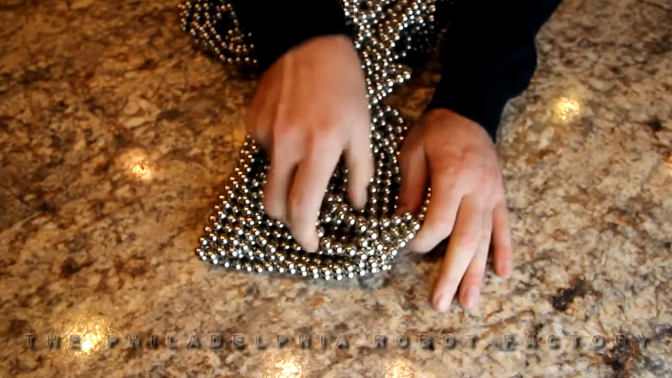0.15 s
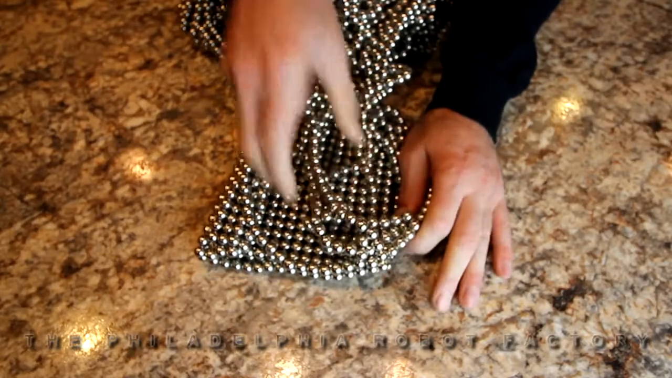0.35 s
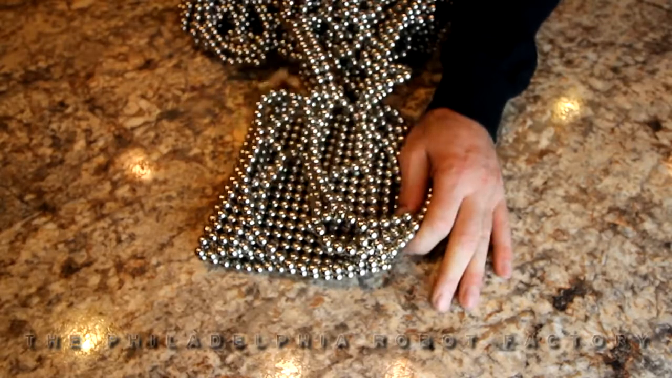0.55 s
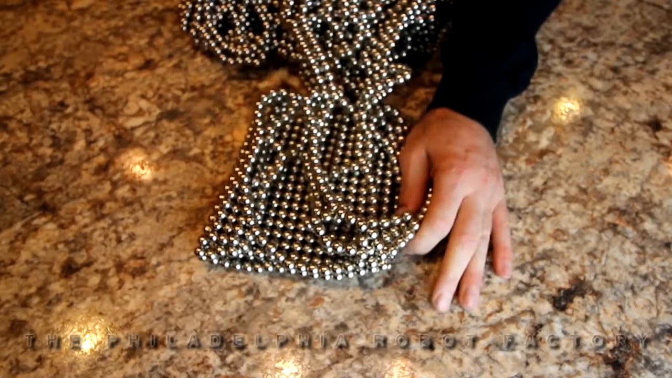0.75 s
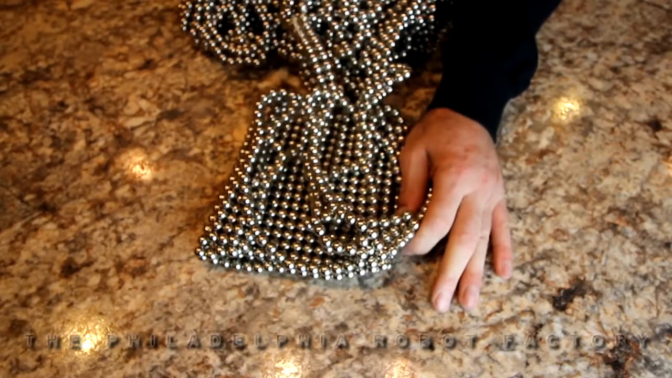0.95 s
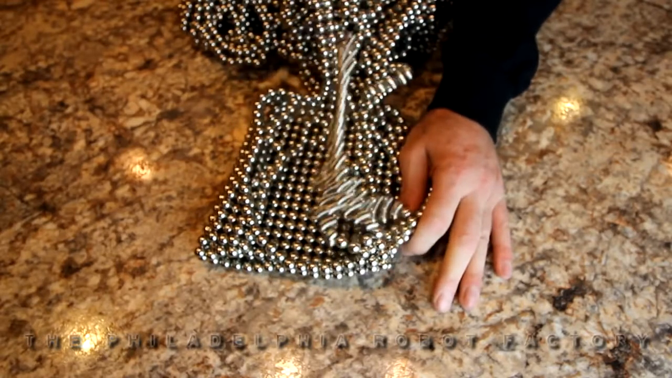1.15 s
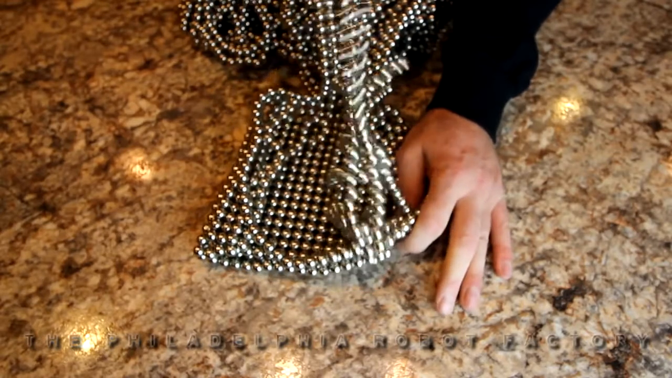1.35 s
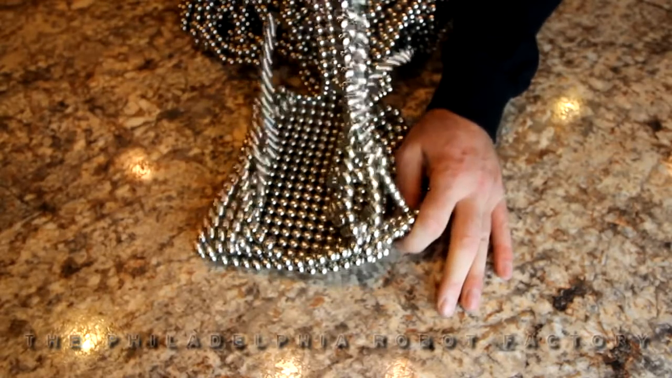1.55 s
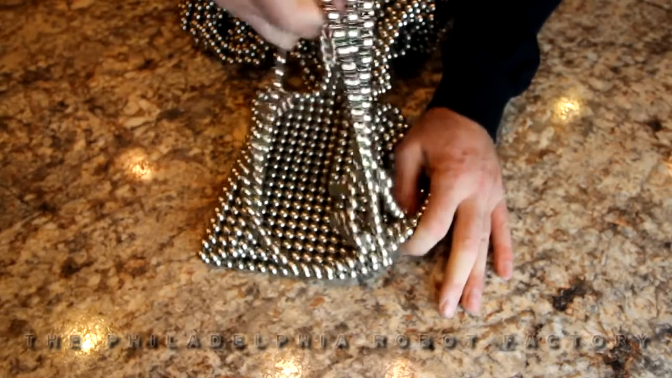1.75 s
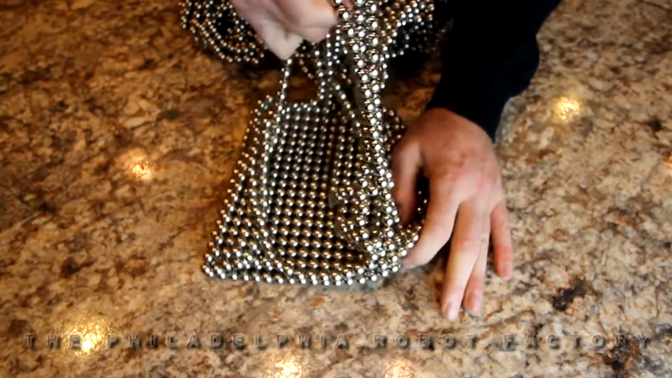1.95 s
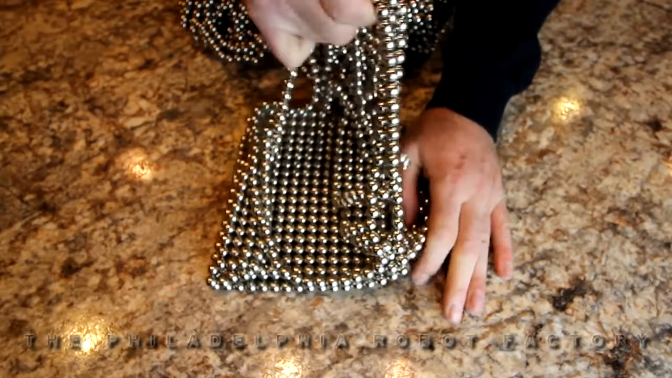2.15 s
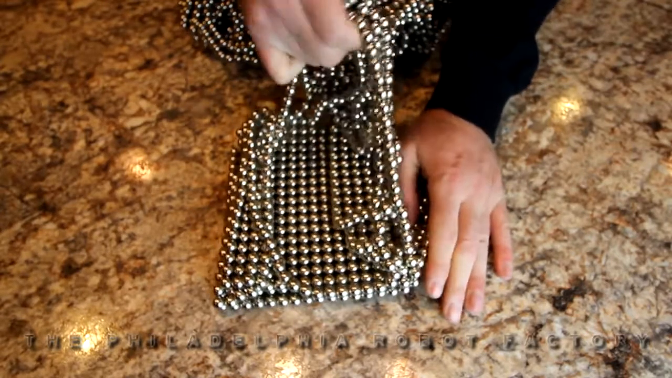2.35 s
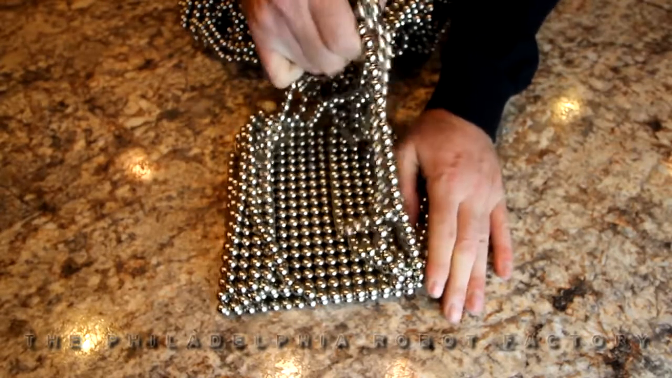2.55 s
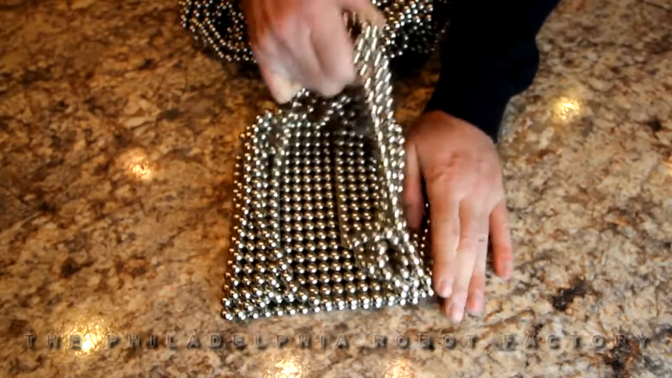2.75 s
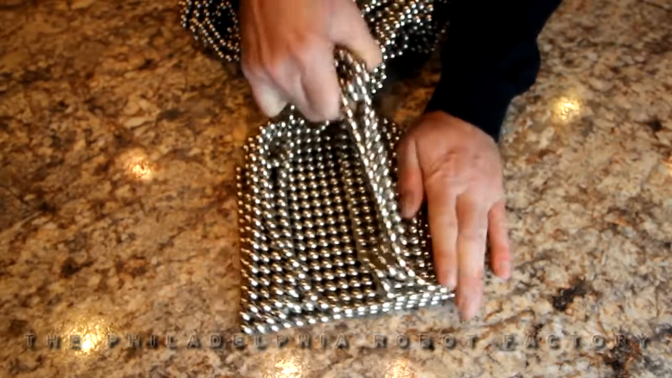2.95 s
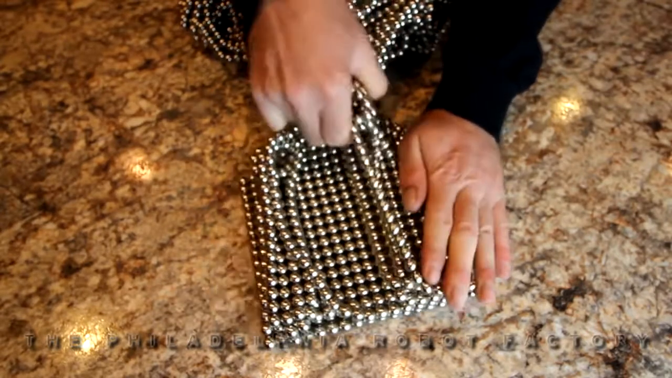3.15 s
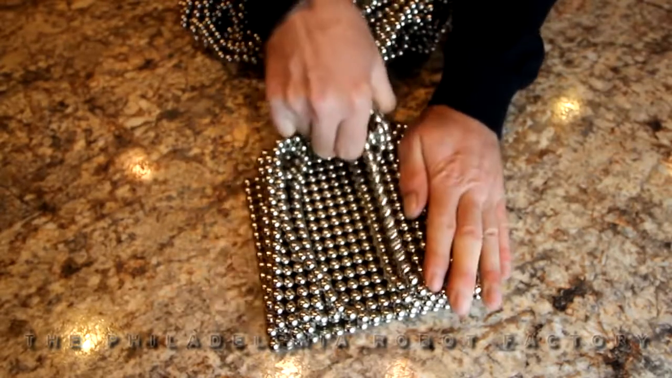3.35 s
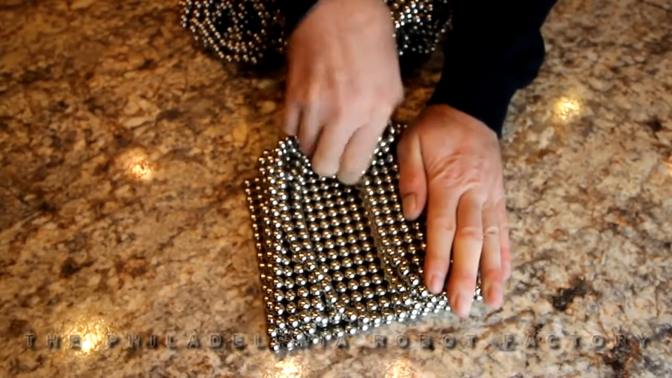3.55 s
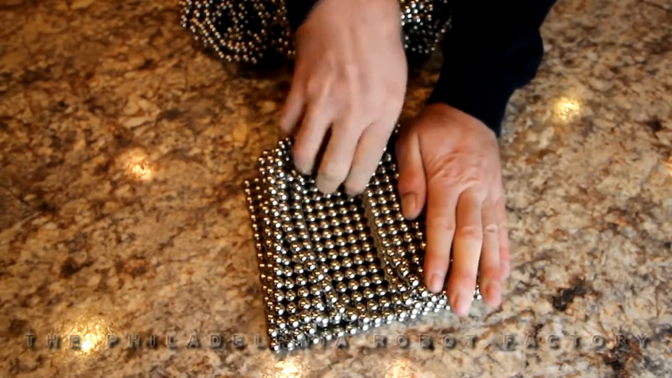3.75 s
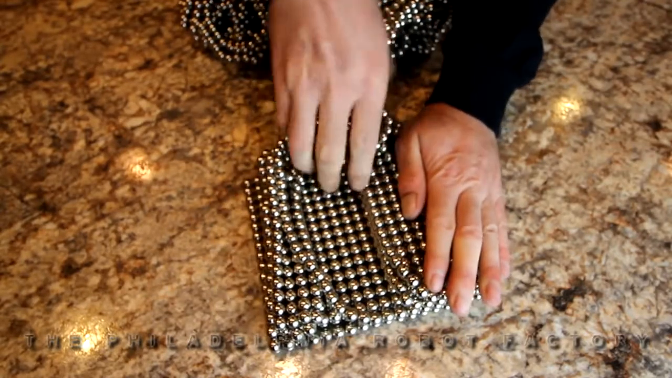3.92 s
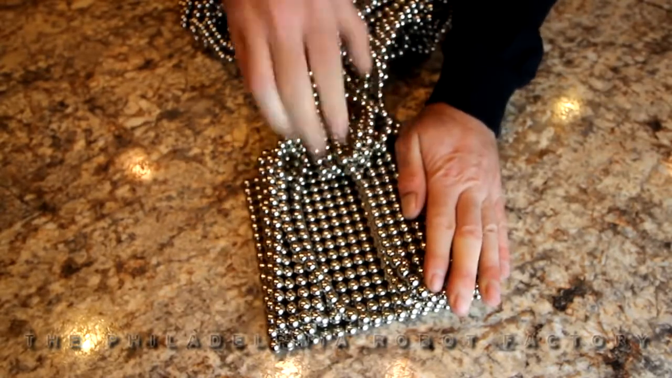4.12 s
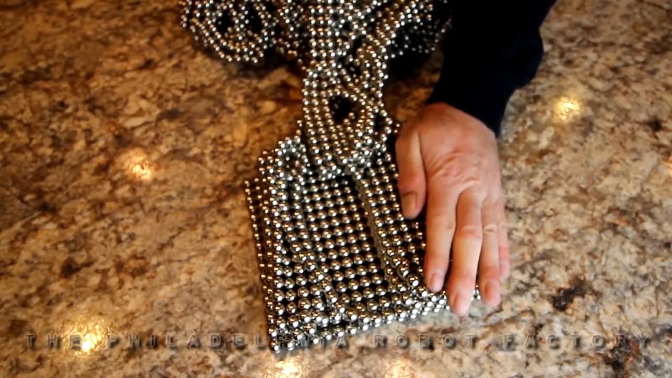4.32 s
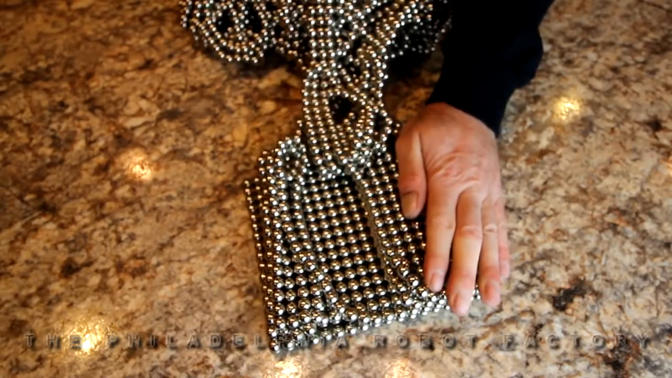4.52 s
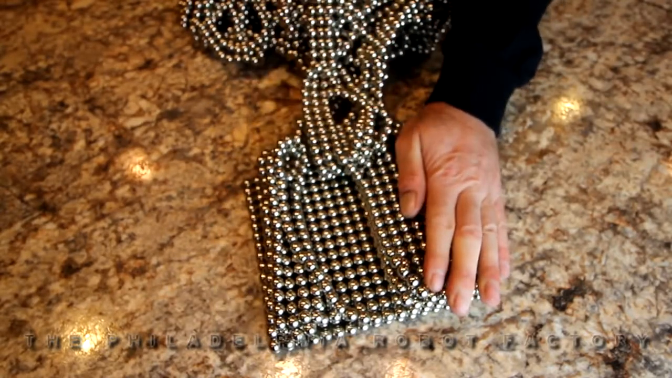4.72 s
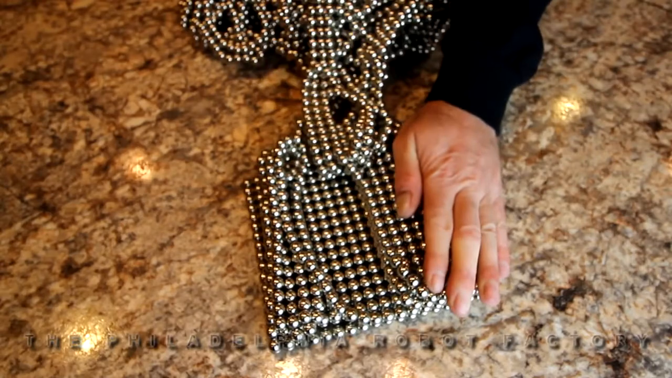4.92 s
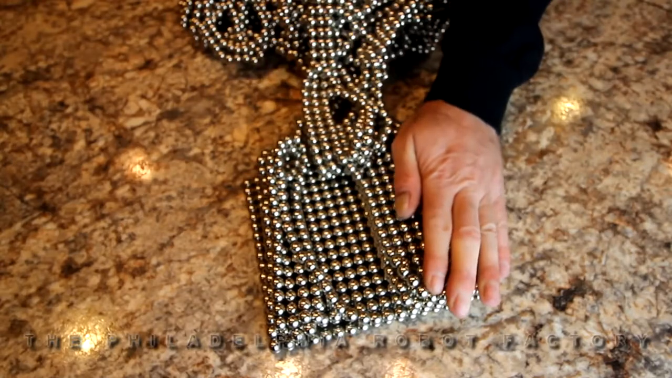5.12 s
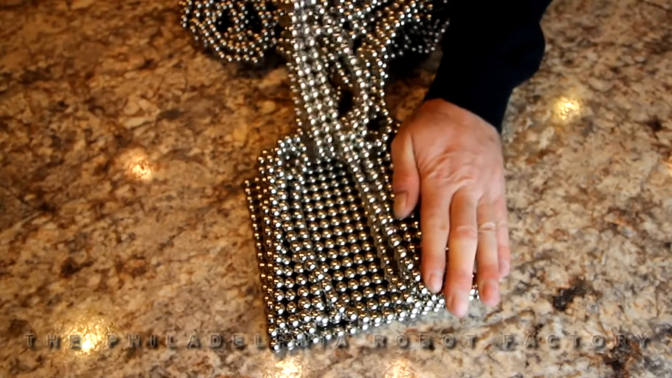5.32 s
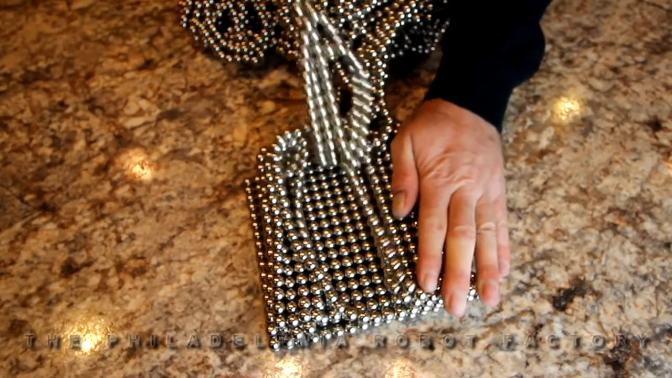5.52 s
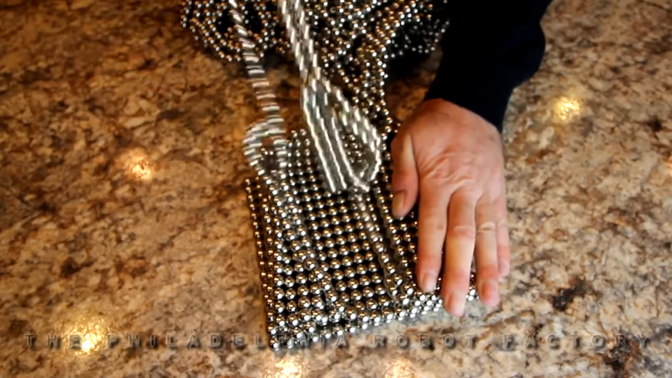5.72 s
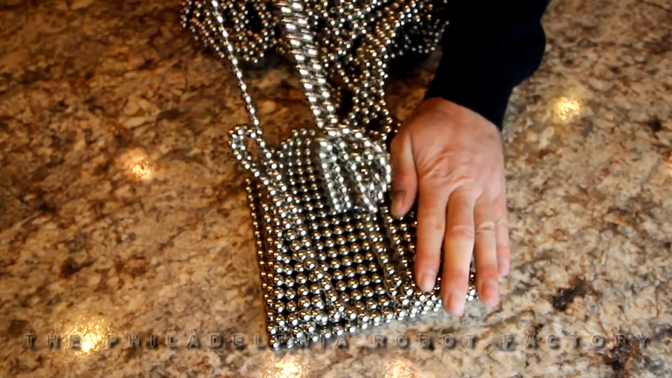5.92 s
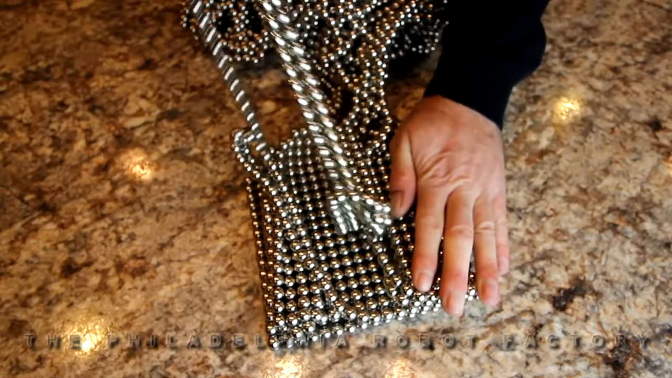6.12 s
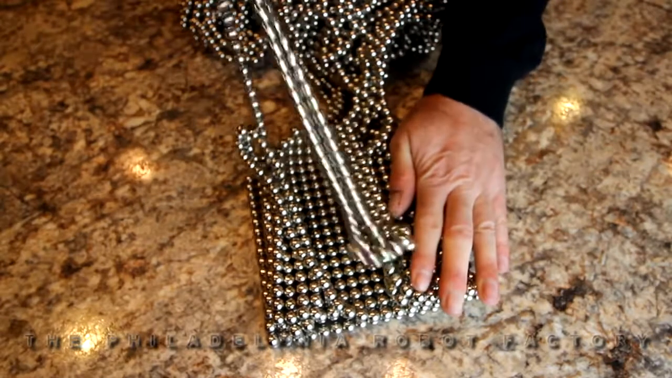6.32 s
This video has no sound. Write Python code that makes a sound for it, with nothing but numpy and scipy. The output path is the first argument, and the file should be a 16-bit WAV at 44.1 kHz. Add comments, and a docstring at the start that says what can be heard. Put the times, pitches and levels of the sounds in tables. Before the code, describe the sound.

Reversed sound of small magnet balls on a stone countertop, close and crisp in a quiet kitchen; short echoes swell into every click and stop abruptly. At 0.1 s comes a loud cluster of steel snaps with a low counter boom, then a dull bump near 0.27. A faint sleeve swish fills the lull until 0.7, when quick ticking runs begin. From 1.15 to 1.9 clicks thicken, with clumps knocking, gritty drags and ringing stone. Scattered clicks and runs continue to 2.7; a heavier knock and scraping slide follow at 2.8-3.2. Strong snaps strike at 3.55 and 3.77, with a clack and soft hand thumps to about 4.1. It is nearly silent until sharp snaps at 4.4. Sparse ticks lead to renewed crackling runs at 5.2-5.6, then lighter irregular clicking, with a last rattle and drag near 6.45.

```python
"""Magnet balls on stone, reversed

Chains of small magnet balls are peeled off a sheet on a stone countertop, and the sound is played backwards.
Balls click as short noise bursts coloured like steel; clumps knock, drag and excite resonances of the stone.
Hands drive low resonances of slab and cabinet, and a sleeve swishes as filtered noise over a faint hush.
All is built in forward time, then reversed: the kitchen's echo swells before every click and stops dead.
"""
import sys
import numpy as np
from scipy import signal
from scipy.fft import rfft, irfft, next_fast_len
from scipy.io import wavfile
from scipy.ndimage import map_coordinates

SR = 44100
rng = np.random.default_rng(int(sys.argv[2]) if len(sys.argv) > 2 else 0)


def generate_wav(sig):
    """Save sig (samples, or channels by samples) to the path in sys.argv[1] as 16-bit PCM at SR."""
    pcm = np.round(np.clip(np.atleast_2d(sig).T, -1, 1) * 32767).astype(np.int16)
    wavfile.write(sys.argv[1], SR, pcm)


N = 285327

# Single balls jumping together: (playback time [s], relative level [dB], relative body from the stone [dB])
SNAP_EVENTS = [(0.018, -25, 22), (0.0467, -21.5, -9), (0.0672, -30, 5), (0.083, -24, 37), (0.0909, -9, 9),
               (0.0966, -7.5, 6), (0.1032, -1.5, -7), (0.106, 0.5, -4), (0.105, -12.5, 28),
               (0.1136, -3.5, 4), (0.14, -30.5, 22), (0.2814, -17.5, 8.5), (0.7133, -15, 11),
               (0.7211, -16, 11), (0.73, -13.5, 13), (0.7376, -22.5, 13), (0.846, -19, -4),
               (0.872, -10, -4), (0.915, -17, -16), (0.94, -15.5, -9), (0.949, -19, -2), (0.99, -16, -3),
               (1.0113, -16, 2), (1.0317, -18, 5), (1.1625, -15.5, 25), (1.1745, -14, 20), (1.185, -7, 9),
               (1.2052, -13.5, 9), (1.215, -27, 0), (1.276, -21, 0), (1.3373, -28.5, -4),
               (1.3726, -17, -17), (1.407, -9.5, 13), (1.449, -10, 4), (1.4863, -16, 5), (1.514, -13.5, 10),
               (1.57, -14.5, -15), (1.592, -9, 9), (1.6111, -10, 1), (1.624, -5, -17), (1.643, -16, 6),
               (1.8348, -11, 4), (1.8743, -10, -30), (1.895, -13.5, -23), (1.9121, -18, 12),
               (1.9336, -36, 2), (1.972, -23.5, -11), (1.983, -27, 6), (2.049, -24, -10),
               (2.1336, -25.5, 0), (2.162, -12.5, 1), (2.188, -15.5, 11), (2.2235, -13.5, 8),
               (2.2627, -17.5, 16), (2.31, -20, -2), (2.327, -12, 15), (2.361, -10, -28),
               (2.3735, -12.5, -23), (2.4784, -25, 2), (2.4999, -30, -6), (2.54, -11, -15),
               (2.5764, -11, 1), (2.5915, -15, 12), (2.6093, -12, 11), (2.6283, -21, 0), (2.656, -18.5, 10),
               (2.827, -10.5, 8), (2.886, -11.5, -11), (2.8969, -15, -3), (2.944, -25, 24),
               (2.9616, -22, 12), (3.013, -19, -5), (3.0183, -26, 0), (3.0402, -16, -36), (3.0748, -21, 9),
               (3.1115, -15.5, -16), (3.1361, -9.5, -4), (3.1642, -14, -8), (3.207, -21, 15.5),
               (3.223, -7.5, -7), (3.227, -12.5, 6), (3.2516, -20.5, 10), (3.331, -19, 13),
               (3.342, -17.5, 3), (3.3937, -19.5, 10), (3.41, -13.5, 9), (3.426, -14, -5), (3.437, -16, -2),
               (3.444, -18.5, -2), (3.4886, -18, 2), (3.549, -2, -8), (3.558, -4, 6), (3.5628, -3, 15),
               (3.602, -20, 5), (3.627, -9.5, 11), (3.685, -16.5, 2), (3.6916, -15, 2), (3.7607, -6.5, 10),
               (3.769, -2, -2), (3.7768, -6.5, 6), (3.802, -21.5, 27), (3.81, -16.5, 2),
               (3.8345, -18.5, 14), (3.947, -22.5, 25), (4.117, -50.5, 24), (4.3544, -25, 10),
               (4.4123, -8.5, 7), (4.443, -5.5, 4), (4.446, -7.5, 6), (4.4541, -5.5, -16),
               (4.6102, -15, -3), (4.6235, -11, -8), (4.651, -22.5, 7.5), (4.75, -17, 4), (4.8259, -19, 9),
               (4.835, -28, 12), (4.8794, -24.5, 11), (4.8966, -20, 9), (4.903, -23, 15),
               (4.912, -20.5, 10), (5.0212, -19.5, -2), (5.063, -23.5, 8), (5.0876, -29, -4),
               (5.1536, -14, 4), (5.161, -24, 10), (5.202, -25, 4), (5.2094, -11.5, -22), (5.2453, -12, 13),
               (5.2586, -13, -4), (5.288, -9.5, -7), (5.3033, -17, -4), (5.317, -8.5, 11.5),
               (5.3336, -12, 0), (5.353, -15, 7.5), (5.3785, -15, -5), (5.4051, -14, -2),
               (5.4668, -24.5, 11), (5.5297, -18, 8), (5.546, -27, 3), (5.583, -10, -22), (5.603, -6, -32),
               (5.61, -13, 9), (5.6626, -22, 7), (5.6943, -22, 0), (5.7706, -11, -3), (5.7819, -23, 7),
               (5.798, -19.5, -4), (5.853, -12, -6), (5.8742, -13.5, -21), (5.8985, -10.5, -31),
               (5.955, -14.5, -2), (5.9841, -24, 14), (6.0455, -16, -13), (6.0638, -20, 10),
               (6.096, -19.5, 5), (6.131, -22, 3), (6.1469, -9.5, -37), (6.173, -24.5, 4), (6.2023, -17, 7),
               (6.3135, -23, 8), (6.3323, -17.5, 2), (6.357, -12, 0), (6.393, -28, 7), (6.4159, -15.5, -13)]
# Chains peeled in a run of clicks: (playback start [s], playback end [s], nominal level [dB], rate [clicks/s])
PEEL_RUNS = [(0.673, 0.738, -26.5, 172), (0.817, 0.878, -22, 133), (0.9, 1.081, -27, 56),
             (1.154, 1.274, -23.5, 69.5), (1.307, 2.699, -32.5, 22), (1.603, 1.736, -24.5, 150),
             (1.739, 1.907, -19.5, 136), (2.276, 2.39, -19.5, 105), (2.512, 2.617, -24, 74),
             (2.755, 3.167, -25, 58), (3.18, 3.509, -29, 40), (3.535, 3.65, -17.5, 82),
             (4.4, 4.485, -21, 90), (4.7, 6.449, -33.5, 28.1), (5.209, 5.3, -23.5, 141),
             (5.545, 5.627, -19.5, 120), (6.279, 6.372, -23.5, 72), (6.443, 6.477, -21, 105)]
# Resonances of the stone slab: (frequency [Hz], bandwidth [Hz], relative level [dB])
SLAB_MODES = [(155.5, 11.2, -3), (213.8, 20, -3), (271.3, 26, -9), (390, 57, -11.5)]

MOVE_ONSET_DB_PER_S, MOVE_FADE_DB_PER_S = 604, 217  # in forward time: brisk start, slower fade


def amp(db):
    """Level law: decibels to amplitude gain."""
    return 10 ** (np.asarray(db) / 20)


def unit(x):
    """Power normalization: scale to an rms of 1."""
    return x / np.sqrt(np.mean(x ** 2) + 1e-20)


def along(points, hz):
    """Spectral interpolation: (frequency, value) points read on a logarithmic frequency axis."""
    f, v = np.transpose(points)
    return np.interp(np.log(hz + 1), np.log(f + 1), v)


def forwards(s):
    """Time reversal: playback time to the sample at which the event really happens."""
    return N - 1 - np.round(s * SR).astype(int)


def filtered(x, response):
    """Linear filtering: the spectrum is multiplied by a function of frequency."""
    size = next_fast_len(N + SR // 2)  # zero padding leaves room for the tail
    return irfft(rfft(x, size) * response(np.fft.rfftfreq(size, 1 / SR)), size)[:N]


def resonate(push, modes):
    """Modal superposition: a body answers with damped resonances of alternating sign."""
    def response(hz):
        total = 0
        for k, (centre, width, db) in enumerate(modes):
            damping = 1j * hz * width
            total = total + (-1) ** k * amp(db) * damping / (centre * centre - hz * hz + damping)
        return total
    return filtered(push, response)


def blows(s, db):
    """Impulse excitation: one impulse per contact, in forward time."""
    return np.bincount(np.clip(forwards(s), 0, N - 1), amp(db), N)


def moves(rows, fade=MOVE_FADE_DB_PER_S):
    """Exponential envelopes: each (start, end, level) move rises, holds and fades, in forward time."""
    s = np.arange(0, N / SR + .002, .002)
    first, last, db = np.transpose(rows)[:3, :, None]
    fade_db = fade * np.maximum(first - s, 0)
    onset_db = MOVE_ONSET_DB_PER_S * np.maximum(s - last, 0)
    gain = amp(np.max(db - fade_db - onset_db, axis=0))
    return np.interp(np.arange(N)[::-1] / SR, s, gain)


def surges(rate, depth_db):
    """Random amplitude modulation: a smooth gain through `rate` random knots per second."""
    knots = rng.standard_normal(int(N * rate / SR) + 4)
    return amp(depth_db * map_coordinates(knots, [np.arange(N) * rate / SR]))


def contacts(starts, db, colour, decay, attack, strike, size, taper=1, chatter_db=0):
    """Impact radiation: a sharp strike and a short random ring; db is the energy spread over one millisecond."""
    lead = 32  # samples ahead of the strike
    t = np.maximum(np.arange(size) - lead, 0) / SR
    grain, force = rng.standard_normal((len(starts), 2, size)).transpose(1, 0, 2)
    ring = grain * amp(chatter_db * force)
    ring = ring * np.exp(-(t / decay) ** taper) * (1 - np.exp(-t / attack))
    ring = ring / np.linalg.norm(ring, axis=1, keepdims=True)
    hit = ring + strike * (np.arange(size) == lead)
    hit = irfft(rfft(hit) * colour(np.fft.rfftfreq(size, 1 / SR)), size)
    hit = hit * signal.windows.tukey(size, lead / size)
    energy = np.sum(hit ** 2, axis=1) / (SR / 1000)
    hit = hit * (amp(db) / np.sqrt(energy))[:, None]
    where = np.clip(starts - lead, 0, N)[:, None] + np.arange(size)
    return np.bincount(where.ravel(), hit.ravel(), N)[:N]


def room_hush(level_db=-67):
    """Stationary noise: the room's faint hush is steady noise with a fixed spectrum."""
    # Colour of the hush: (frequency [Hz], relative density [dB per Hz])
    hush_colour = [(20, 5), (150, -11.5), (400, -18), (1500, -19), (9000, -25), (16000, -24.5)]
    noise = filtered(rng.standard_normal(N), lambda hz: amp(along(hush_colour, hz)))
    return amp(level_db) * unit(noise)


def kitchen(x, build=0.007):
    """Diffuse reverberation: an echo builds up quickly and decays at a rate set by frequency."""
    # Decay of the kitchen's echo: (frequency [Hz], t60 [s])
    echo_decay = [(200, 0.14), (1500, 0.32), (4000, 0.38), (9000, 0.35), (15000, 0.21)]
    hz, t, z = signal.stft(rng.standard_normal(SR * 3 // 4), SR, nperseg=256)
    decay = amp(-60 * t / along(echo_decay, hz)[:, None])
    tail = signal.istft(z * decay, SR, nperseg=256)[1]
    tail = tail * (1 - np.exp(-np.arange(len(tail)) / SR / build))
    return signal.fftconvolve(x, tail / np.linalg.norm(tail))[:N]


def sleeve():
    """Friction and flow noise: cloth swishes faintly, with a low draught, as the arm moves away."""
    # The arm is drawn back: (playback start [s], playback end [s], nominal level [dB])
    arm_moves = [(0.3, 0.72, -58.5)]
    # Colour of sleeve and draught: (frequency [Hz], relative density [dB per Hz])
    cloth_colour = [(30, -12), (60, -25), (120, -22), (500, -39), (2000, -42), (9000, -35.5),
                    (16000, -52.5)]
    envelope = moves(arm_moves) * surges(14, 2)
    return envelope * unit(filtered(rng.standard_normal(N), lambda hz: amp(along(cloth_colour, hz))))


def rumble(boom_db=-1, shake_db=-2, thump_db=24, soft_hz=330):
    """Forced vibration: uneven pushes and soft thumps shake the slab and the cabinet under it."""
    # The hands bear on the counter:
    # (playback start [s], playback end [s], relative cabinet boom [dB], relative slab shake [dB])
    presses = [(0.09, 0.298, -46.5, -54), (0.655, 0.927, -63, -65), (1.12, 1.224, -53, -58),
               (1.37, 1.975, -61.5, -57.5), (1.977, 2.36, -58, -56), (2.543, 3.106, -57, -55),
               (3.215, 3.63, -62, -58.5), (3.705, 3.968, -55, -60), (4.081, 4.106, -63.5, -59),
               (4.41, 4.45, -57, -55.5), (4.59, 5.028, -65, -63.5), (5.177, 5.9, -60.5, -60),
               (5.97, 6.474, -60, -57)]
    # Resonance of the cabinet: (frequency [Hz], bandwidth [Hz], relative level [dB])
    cabinet_modes = [(77.5, 13, 0)]
    # A hand lands softly on the slab: (playback time [s], relative level [dB])
    hand_thumps = [(0.261, -24), (3.692, -17), (3.811, -12.5), (3.85, -15.5), (3.985, -25.5),
                   (4.042, -26.5), (4.117, -25)]
    booms = moves([(first, last, boom) for first, last, boom, shake in presses])
    shakes = moves([(first, last, shake) for first, last, boom, shake in presses])
    push = surges(22, 3.5)
    cabinet = amp(boom_db) * booms * unit(resonate(rng.standard_normal(N), cabinet_modes))
    slab = amp(shake_db) * shakes * unit(resonate(push * rng.standard_normal(N), SLAB_MODES))
    s, db = np.transpose(hand_thumps)
    thumps = resonate(blows(s, db + thump_db), SLAB_MODES)
    # soft hands excite no treble
    return filtered(cabinet + slab + thumps, lambda hz: 1 / np.sqrt(1 + (hz / soft_hz) ** 4))


def rubbing(centre_hz=720, octaves=1.0):
    """Uneven slip: a fingertip scrapes dully over the stone as modulated band noise."""
    # Slips of the fingertip: (playback start [s], playback end [s], level [dB])
    rubs = [(3.91, 3.95, -55.5), (5.845, 5.862, -53)]
    hump = lambda hz: 1 / (1 + np.abs(np.log2((hz + 1) / centre_hz) / octaves) ** 3)
    band = filtered(rng.standard_normal(N), hump)
    return moves(rubs) * unit(band * surges(220, 6))


def dragging(sing_db=-2):
    """Roughness excitation: skidding balls meet a stream of tiny bumps, and a sliding sheet rings with them."""
    # Balls dragged over the stone: (playback start [s], playback end [s], level [dB])
    drags = [(0, 0.11, -51.5), (0.13, 0.26, -57.5), (1.16, 1.29, -45.5), (1.39, 1.58, -54), (1.6, 1.9, -47),
             (1.99, 2.1, -55.5), (2.19, 2.36, -49), (2.56, 2.72, -51.5), (2.75, 2.92, -42),
             (2.93, 3.16, -52), (3.33, 3.5, -57), (3.54, 3.62, -46), (3.67, 3.8, -50), (4.42, 4.46, -53.5),
             (5.2, 5.34, -54), (5.52, 5.62, -54), (6.45, 6.47, -46)]
    # The whole sheet pushed along: (playback start [s], playback end [s], relative level [dB])
    slides = [(2.87, 2.91, -45), (2.95, 3.15, -52.5), (3.19, 3.27, -58)]
    # Colour of dragging: (frequency [Hz], relative density [dB per Hz])
    drag_colour = [(150, -29), (400, -1.5), (800, 1), (1300, 1), (2200, -2.5), (4000, -4.5), (8000, -5),
                   (14000, -47.5)]
    # Resonance of the sheet of balls: (frequency [Hz], bandwidth [Hz], relative level [dB])
    sheet_modes = [(1290, 250, 0)]
    count = 2200
    starts = rng.integers(0, N, count)
    sizes_db = 5.5 * np.clip(rng.standard_normal(count), -2, 2)
    colour = lambda hz: amp(along(drag_colour, hz))
    bumps = contacts(starts, sizes_db, colour, decay=.0016, attack=.0001, strike=0, size=384)
    skid = moves(drags) * unit(bumps)
    song = unit(resonate(bumps, sheet_modes) * surges(60, 4))
    return skid + amp(sing_db) * moves(slides) * song


def knocks(width=0.52, gain_db=-1, body_db=-10, thud_db=24, ring_db=21, decay=0.0088, strike=0.69):
    """Impact of a larger mass: a clump clacks lower and longer, rings the stone and thuds into the slab."""
    # Clumps on the stone: (playback time [s], relative level [dB], pitch [Hz], relative thud over clack [dB])
    clump_hits = [(0.1053, -24.5, 1100, 13.5), (0.1065, -30, 2600, 3), (0.2815, -34.5, 4530, 4),
                  (1.161, -26, 3140, 2), (1.176, -29, 1570, 1), (1.184, -17, 4860, -13),
                  (1.251, -27, 1950, 8), (1.284, -28.5, 1160, 7), (1.487, -19.5, 3500, -25),
                  (1.5133, -15, 3730, -14), (1.6104, -14, 1700, 5.5), (1.625, -14.5, 2000, 7.5),
                  (1.788, -23.5, 1750, 4), (1.851, -23.5, 2960, -15), (2.785, -17, 2900, 8),
                  (2.888, -24, 1590, 1), (2.903, -22.5, 1750, -5), (3.144, -24.5, 2470, 3),
                  (3.55, -28, 1810, 15), (3.607, -26.5, 2320, 9), (3.764, -23.5, 2510, 2),
                  (3.7783, -9.5, 2320, -7), (3.963, -43, 2180, -18.5), (4.75, -29.5, 3970, -1.5),
                  (5.317, -26, 2400, 2), (5.582, -27.5, 1740, 10), (5.861, -33.5, 1010, 11),
                  (6.2024, -32.5, 4350, -2), (6.466, -29.5, 2070, 4)]
    # Ringing of the stone under a knock: (frequency [Hz], bandwidth [Hz], relative level [dB])
    stone_modes = [(1593, 43, 0.5), (1740, 50, -4), (2124, 9.4, 2.5), (2600, 410, -7), (3504, 300, -0.5)]
    s, db, pitch, weight_db = np.transpose(clump_hits)
    hump = lambda hz, centre: 1 / (1 + np.abs(np.log((hz + 1) / centre) / width) ** 3)
    body = amp(body_db + np.minimum(weight_db[:, None], 0))  # weak thuds also have less dull body
    colour = lambda hz: hump(hz, pitch[:, None]) + body * hump(hz, 520)
    life = decay * 2000 / pitch[:, None]  # lower clacks last longer
    clack = contacts(forwards(s), db + gain_db, colour, decay=life, attack=.00008, strike=strike, size=768)
    ring = resonate(blows(s, db + ring_db), stone_modes)
    thud = resonate(blows(s, db + weight_db + thud_db), SLAB_MODES)
    return clack + ring + thud


def ball_clicks(starts, db, touch_db=2.0, scatter_db=0.0, ring_hz=9500, ring_db=5, decay=0.0016, strike=0.5):
    """Elastic impact: steel clicks vary in pitch and length, with more body the nearer to the stone."""
    # Colour of a ball's click: (frequency [Hz], relative density [dB per Hz])
    steel_colour = [(200, -32.5), (800, -34.5), (1600, -31), (3800, -21), (5000, -12.5), (6500, -10.5),
                    (8000, -6.5), (9600, -2.5), (12000, -5.5), (15500, -17.5)]
    pitch, touch, length = rng.standard_normal((len(starts), 3)).T[:, :, None]
    stress = lambda hz: np.exp(-((np.log2((hz + 1) / ring_hz) - .3 * pitch) / .2) ** 2)
    near_db = touch_db + scatter_db * np.clip(touch, -2, 1.3)
    body_db = lambda hz: near_db / (1 + (hz / 4500) ** 4)
    colour = lambda hz: amp(along(steel_colour, hz) + ring_db * stress(hz) + body_db(hz))
    life = decay * np.exp(.3 * length)
    # touching balls chatter: the ring breaks up into tiny contacts of random strength
    return contacts(starts, db, colour, decay=life, attack=.00012, strike=strike, size=320,
                    taper=1.8, chatter_db=6)


def rattle(gain_db=-20, fade_db_per_s=456):
    """Random contact noise: neighbours tick as a chain bends, the more the harder and faster it is peeled."""
    bending = [(first, last, db + 10 * np.log10(rate / 100)) for first, last, db, rate in PEEL_RUNS]
    count = 1100
    starts = rng.integers(0, N, count)
    sizes_db = 5 * np.clip(rng.standard_normal(count), -2, 1.3)
    return amp(gain_db) * moves(bending, fade_db_per_s) * unit(ball_clicks(starts, sizes_db))


def peeling(count=48, straggle_gaps=3.1, scatter_db=3.8):
    """Successive release and rebound: balls let go at uneven times and strengths, each with a finer tick after."""
    first, last, db, rate = np.transpose(PEEL_RUNS)[:, :, None]
    late, force, flight, bounce = rng.random((len(PEEL_RUNS), 4, count)).transpose(1, 0, 2)
    s = last - (np.arange(count) + straggle_gaps * (late - .5) + .5) / rate
    uneven_db = scatter_db * np.sqrt(12) * (force - .5)  # uniform, with standard deviation scatter_db
    sizes_db = np.where(s > first, db + uneven_db, -np.inf)
    rebound_s = s - np.interp(flight, [0, 1], (.002, .008))  # earlier in playback is later in forward time
    rebound_db = sizes_db - np.interp(bounce, [0, 1], (5, 16))
    return ball_clicks(forwards(np.ravel([s, rebound_s])), np.ravel([sizes_db, rebound_db]))


def snaps_all_round(facing_share=0.7, usual_db=-18):
    """Directional averaging: as the room gets them, snaps share one colour and the loudest stand out less."""
    # Colour of a click summed over all directions: (frequency [Hz], relative density [dB per Hz])
    diffuse_colour = [(500, -23.5), (2000, -20), (4000, -15), (6000, -6), (9500, 2.2), (12500, -2),
                      (15500, -15.5)]
    s, db, _ = np.transpose(SNAP_EVENTS)
    # part of the extra loudness comes only from facing the microphone
    facing_db = facing_share * np.maximum(db - usual_db, 0)
    colour = lambda hz: unit(amp(along(diffuse_colour, hz)))
    return filtered(blows(s, db - facing_db), colour) * np.sqrt(SR / 1000)


def snaps(gain_db=-1.53, body_db=-4, neighbour_db=-11):
    """Magnetic attraction and impact: balls jump the last gap, and the jolt makes neighbours click just after."""
    s, db, touch_db = np.transpose(SNAP_EVENTS)
    starts = forwards(s)
    lag, size = rng.standard_normal((2, len(s), 3))  # three neighbours per snap
    delay = (SR * (.0006 + .0009 * np.abs(lag))).astype(int)
    neighbours = starts[:, None] + delay
    sizes_db = db[:, None] + neighbour_db + 2.0 * size
    hits = ball_clicks(starts, db, touch_db[:, None] + body_db, scatter_db=2)
    return amp(gain_db) * (hits + ball_clicks(neighbours.ravel(), sizes_db.ravel()))


def scene(echo_db=-11.0, knock_echo_db=-4):
    """Superposition: direct sounds of the counter and their echo add up, in forward time."""
    chains = peeling() + rattle()
    clumps = knocks()
    skids = dragging() + rubbing()
    echo = amp(echo_db) * kitchen(chains + amp(knock_echo_db) * clumps + skids + snaps_all_round())
    return (snaps() + chains + clumps + skids + echo + rumble() + sleeve() + room_hush())[None]


def record(dry):
    """Saturation, band limiting and time reversal: loud peaks are rounded, treble is cut, time runs backwards."""
    top_hz = 15850
    rounded = dry[0] / (1 + (dry[0] / .8) ** 6) ** (1 / 6)
    limited = filtered(rounded, lambda hz: (1 - np.tanh((hz - top_hz) / 180)) / 2)
    return limited[None, ::-1]


dry = scene()
out = record(dry)
generate_wav(out)
```